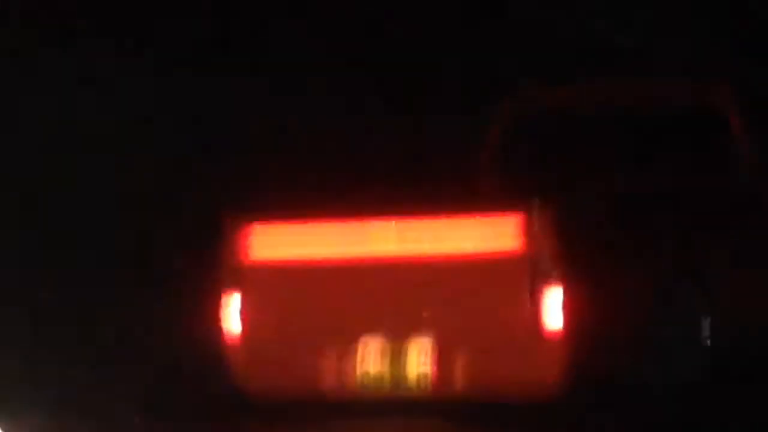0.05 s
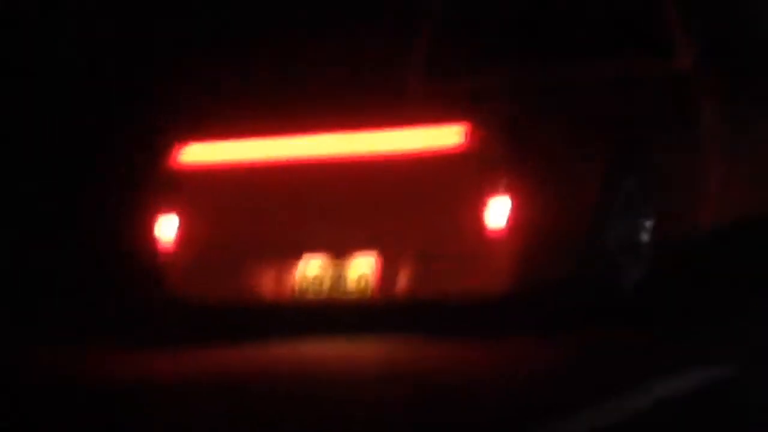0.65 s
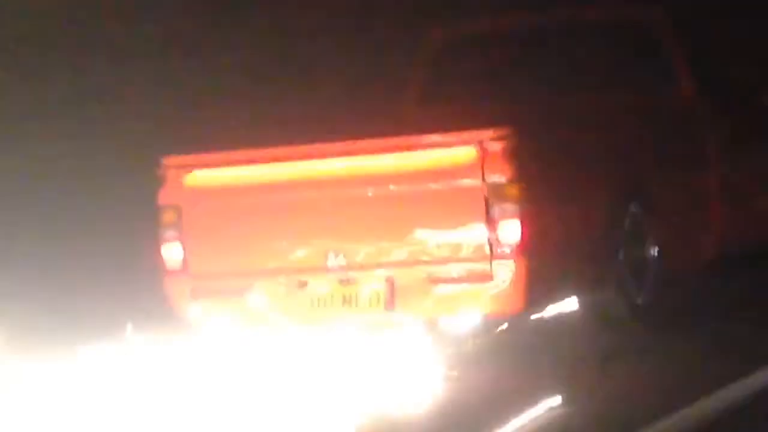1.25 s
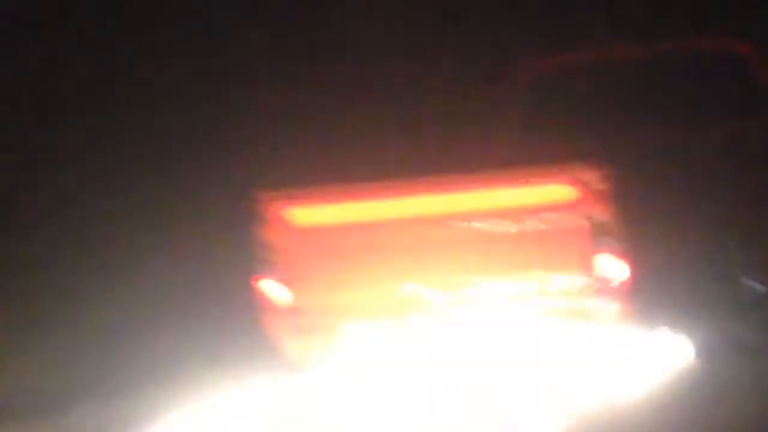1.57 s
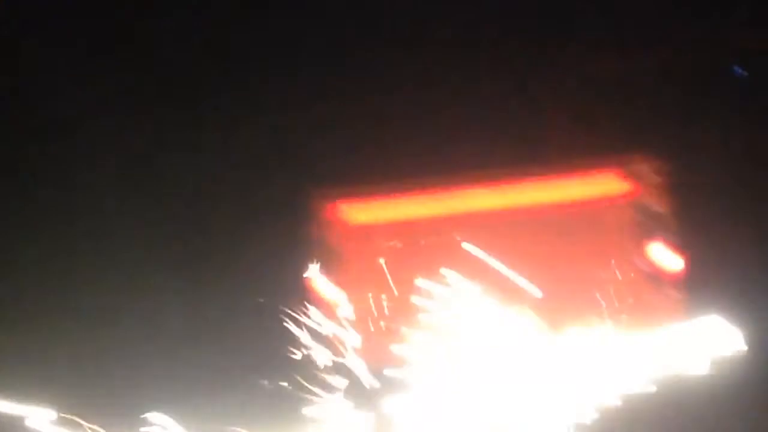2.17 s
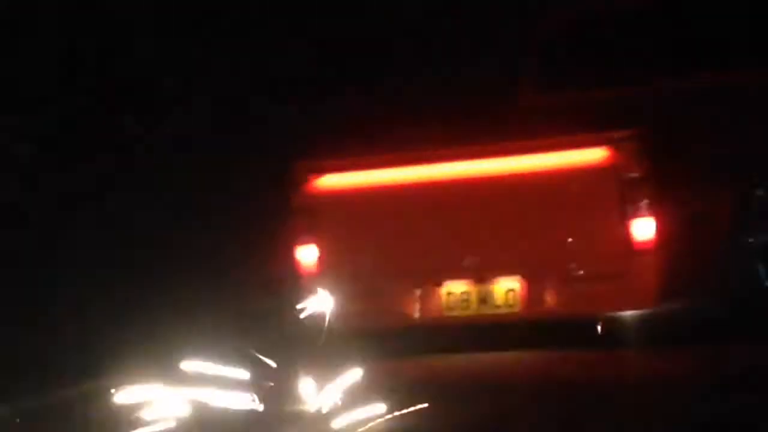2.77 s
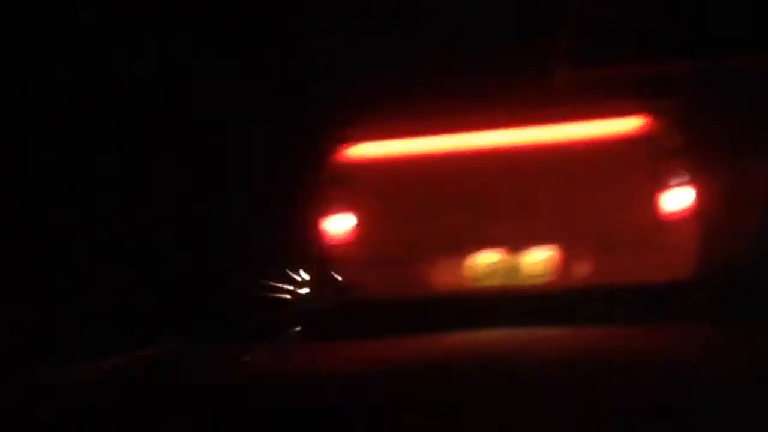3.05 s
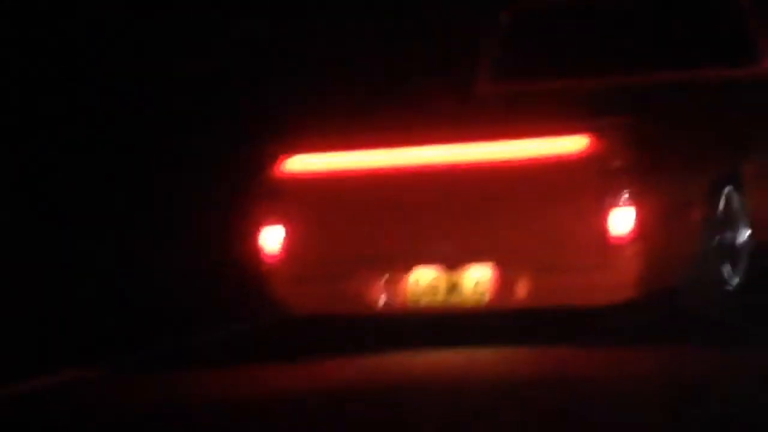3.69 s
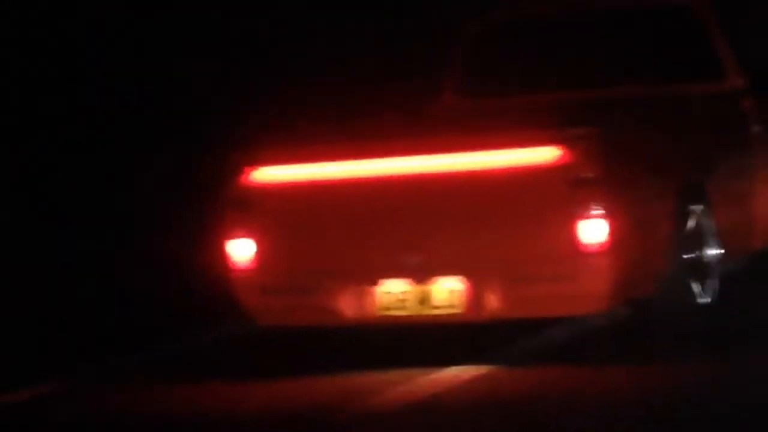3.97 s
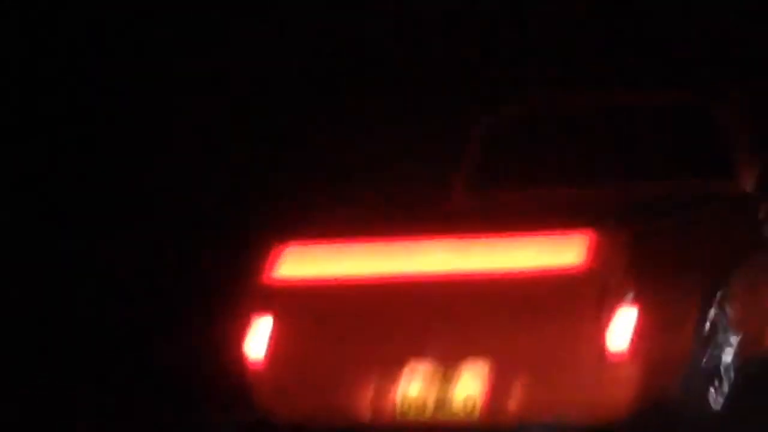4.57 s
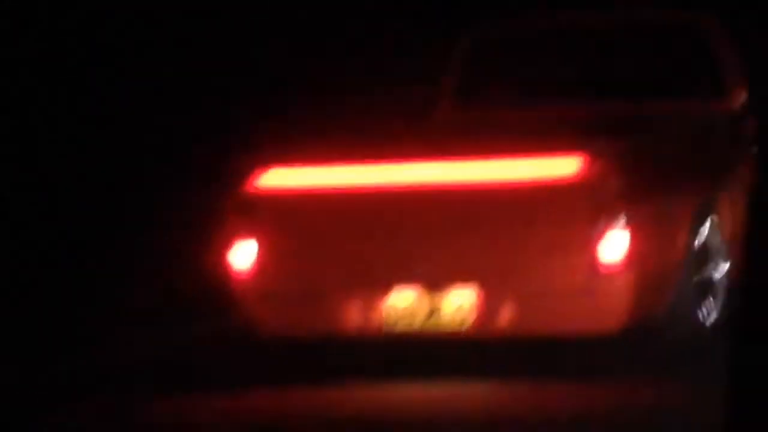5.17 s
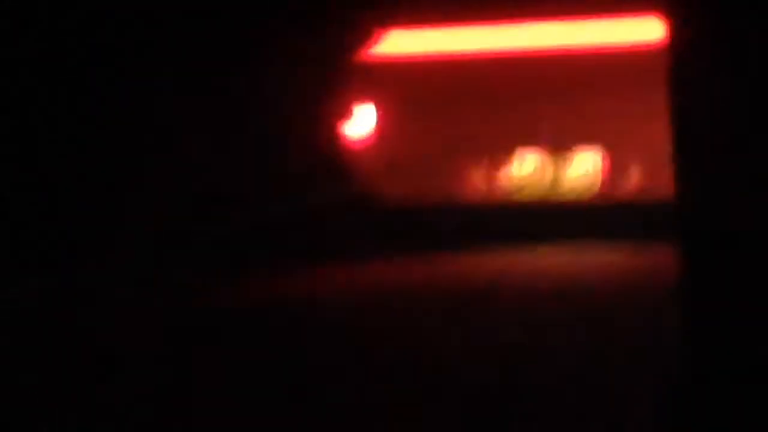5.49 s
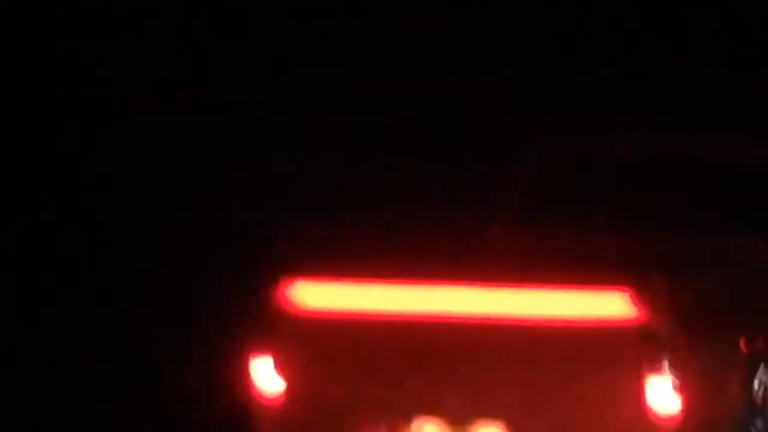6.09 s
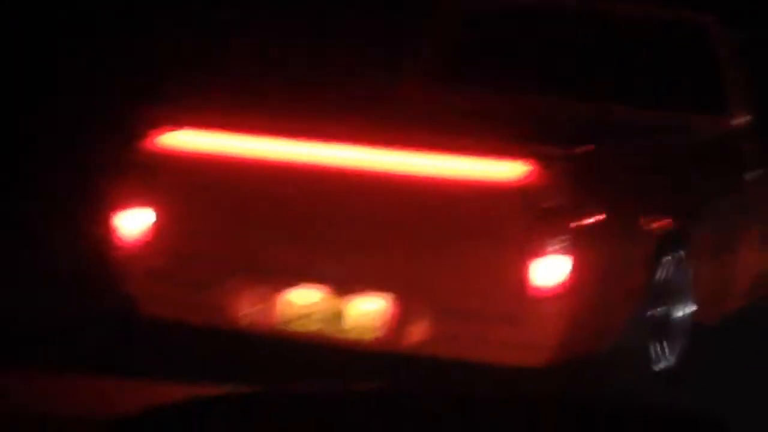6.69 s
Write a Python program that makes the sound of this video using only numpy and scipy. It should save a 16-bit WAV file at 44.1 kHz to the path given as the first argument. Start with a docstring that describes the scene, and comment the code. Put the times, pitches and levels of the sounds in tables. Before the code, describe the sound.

Wind buffets the microphone on a moving car as metal scrapes the road, then tyre roar and a low engine drone take over.

```python
"""A road at night, in a car following a lowered pickup that drags its metal underside.
The slipstream buffets and tears at the microphone, then eases to single thumps, while the skid plate
grinds on the asphalt in a few strokes. Tyre roar takes over, dipping after two hard blows of wind and
swelling back. Near the end the two engines drone against each other. A fast limiter holds the peaks."""
import sys
import numpy as np
from scipy import signal
from scipy.fft import rfft, irfft, next_fast_len
from scipy.io import wavfile
from scipy.ndimage import uniform_filter1d, minimum_filter1d, map_coordinates

SR = 44100
rng = np.random.default_rng(int(sys.argv[2]) if len(sys.argv) > 2 else 0)


def master(y):
    """Save y as 16-bit WAV."""
    cut = np.clip(np.atleast_2d(y).T, -1, 1)
    pcm = np.round(cut * 32767)  # scale
    wavfile.write(sys.argv[1], SR, pcm.astype(np.int16))


N = 301644
TIME = np.arange(N) / SR


def amp(db):
    """Decibels to gain."""
    return 10 ** (np.asarray(db) / 20)


def unit(x):
    """Scale to rms 1."""
    return x / np.sqrt(np.mean(x ** 2) + 1e-20)


def since(s):
    """Seconds since time s, 0 before it."""
    return np.maximum(TIME - s, 0)


def curves(rows):
    """An automation curve for each column after the time."""
    times, *columns = np.transpose(rows)
    return [np.interp(TIME, times, column) for column in columns]


def during(rows, fade_s):
    """A gate that is open while a table lasts, with a fade on both sides."""
    start, end = rows[0][0], rows[-1][0]
    return np.interp(TIME, [start - fade_s, start, end, end + fade_s], [0, 1, 1, 0])


def wobble(rate):
    """Smooth random modulation, rate knots a second."""
    knots = rng.standard_normal(int(N * rate / SR) + 4)
    return map_coordinates(knots, [TIME * rate])


def filtered(x, response):
    """EQ x with a gain given as a function of Hz."""
    size = next_fast_len(N + SR // 2)
    return irfft(rfft(x, size) * response(np.fft.rfftfreq(size, 1 / SR)), size)[:N]


def coloured(x, spectrum):
    """EQ x through (Hz, dB) points and scale it to rms 1."""
    points_hz, db = np.transpose(spectrum)
    return unit(filtered(x, lambda hz: amp(np.interp(np.log(hz + 1), np.log(points_hz), db))))


def noise(spectrum):
    """Coloured noise of rms 1."""
    return coloured(rng.standard_normal(N), spectrum)


def grainy(x, depth_db, top_hz, size=1024):
    """Add grain: patches of random gain over time and frequency, shallower above top_hz."""
    frames = signal.stft(x, nperseg=size)[2]
    patches = uniform_filter1d(rng.standard_normal(frames.shape), size=4, axis=0)
    patches = unit(uniform_filter1d(patches, size=4, axis=1))
    hz = np.fft.rfftfreq(size, 1 / SR)[:, None]
    gain = amp(depth_db * patches / np.hypot(1, hz / top_hz))
    return unit(signal.istft(frames * gain, nperseg=size)[1][:N])


def add(track, s, sound):
    """Mix a sound into a track from time s."""
    part = track[max(round(s * SR), 0):][:len(sound)]
    part += sound[:len(part)]


# The two engine drones. Each row: time in seconds, firing rate in Hz, relative level in dB.
TRUCK_DRONE = [(4.7, 80.4, -36), (5.2, 81.2, -29.5), (5.45, 82.1, -27), (5.62, 81.7, -21), (6.0, 82, -19.5),
               (6.25, 82.2, -20.5), (6.4, 81.3, -29.5)]
CAR_DRONE = [(5.3, 91.9, -31.5), (5.65, 90.1, -24), (5.85, 91.3, -20), (6.12, 91, -22.5), (6.36, 89.1, -26)]
# Their exhaust overtones. Each row: multiple of the firing rate, relative level in dB.
TRUCK_ORDERS = [(2, 0.5), (3, -22), (4, -26)]
CAR_ORDERS = [(2, -1.5), (3, -11), (4, -15), (5, -16)]
# The colour of the exhaust puffs. Each row: frequency in Hz, gain in dB.
EXHAUST_EQ = [(100, -17), (200, 7), (330, -9), (450, -14), (900, -45.5)]

def engine(drone, orders, level_db, jitter, rough_db, puff_db):
    """Exhaust harmonics ride a slightly unsteady firing rate, with a rough puff at each firing."""
    firing_hz, db = curves(drone)
    phase = 2 * np.pi * np.cumsum(firing_hz * (1 + jitter * wobble(25))) / SR
    tone = np.zeros(N)
    for order, order_db in orders:
        gain = amp(order_db + rough_db * wobble(40))
        tone += gain * np.sin(order * phase + rng.uniform(0, 2 * np.pi))
    puffs = unit((1 + np.cos(phase)) * noise(EXHAUST_EQ))
    return during(drone, fade_s=0.1) * amp(db + level_db) * (np.sqrt(2) * tone + amp(puff_db) * puffs)


# The bed of tyre roar. Each row: time in seconds, level before the dips in dB, coarseness from 0 to 1.
TYRE_ROAR = [(0, -25.5, 0.9), (2.0, -34.5, 0.06), (2.2, -19.5, 0.18), (2.85, -20.5, 0.13), (3.15, -19.5, 0),
             (3.45, -19, 0.05), (3.58, -18, 0.05), (3.7, -19.5, 0.21), (3.88, -18.5, 0.14),
             (4.35, -21, 0.03), (4.65, -21.5, 0.12), (4.9, -19.5, 0.01), (5.25, -20.5, 0.05),
             (5.9, -21.5, 0.68), (6.35, -20, 0.87), (6.84, -17, 1)]
# Sudden dips in the roar. Each row: start in seconds, depth in dB.
ROAR_DIPS = [(2.091, 19.5), (3.944, 11.5)]
# The colours of smooth and coarse asphalt. Each row: frequency in Hz, gain in dB.
SMOOTH_ROAD_EQ = [(60, 3.5), (200, -3), (350, -8), (500, -2), (660, 0), (870, 3), (1080, -1), (1300, -5.5),
                  (1700, -11.5), (2300, -15.5), (3000, -22.5), (5500, -24.5), (8000, -34), (11000, -42.5),
                  (15000, -49)]
COARSE_ROAD_EQ = [(100, -1), (280, -9), (550, -11), (750, -8.5), (1000, -1), (1400, -6.5), (1900, -12.5),
                  (2450, -16.5), (2850, -24), (3900, -21), (4800, -29), (6500, -34), (10000, -43),
                  (15000, -56)]

def tyres(flutter_db=0.48, fall_s=0.0043, recovery_s=0.62):
    """Tread blocks drum near 1 kHz, higher on coarse asphalt; the roar dips twice and swells back."""
    db, coarse = curves(TYRE_ROAR)
    for s, depth_db in ROAR_DIPS:
        db -= depth_db * np.minimum(since(s) / fall_s, 1) * np.exp(-since(s) / recovery_s)
    roar = np.sqrt(1 - coarse) * noise(SMOOTH_ROAD_EQ) + np.sqrt(coarse) * noise(COARSE_ROAD_EQ)
    return amp(db + flutter_db * wobble(27)) * grainy(roar, depth_db=2.6, top_hz=2600)


# Scrapes of the skid plate. Each row: start in seconds, length in seconds, relative level in dB.
PLATE_STROKES = [(0.88, 0.27, -37.5), (1.346, 0.21, -31.5), (1.746, 0.2, -30), (1.99, 0.42, -40.5),
                 (2.215, 0.16, -32.5), (2.427, 0.14, -36.5)]

def plate_pressure(bite_s=0.015, arch_db=5.5, lift_db_per_s=296):
    """The plate's load on the road, as a gain: each stroke bites, bears down mid-way and lifts off."""
    pressure = np.zeros(N)
    for s, length, db in PLATE_STROKES:
        bite = np.minimum(since(s) / bite_s, 1)
        arch = np.sin(np.pi * np.minimum(since(s) / length, 1)) - 1
        pressure += bite * amp(db + arch_db * arch - lift_db_per_s * since(s + length))
    return pressure


# The colours of grinding metal and its sparks. Each row: frequency in Hz, gain in dB.
GRIND_EQ = [(150, 7.5), (400, 2.5), (900, -2.5), (1400, -1.5), (2200, -0.5), (3200, -3.5), (4800, -5),
            (7000, -14), (10000, -25.5), (15000, -36)]
SPARK_EQ = [(2000, -28), (5000, 2), (8000, -2), (11000, -4.5), (15000, -17)]

def skid_plate(level_db=4, grit_db=2, chatter_db=1.5, fizz_db=-13, hard_press_db=-31):
    """Stones in the asphalt tear at the plate in a dense grind; hard pressure adds a fizz of sparks."""
    pressure = plate_pressure()
    grit = unit(amp(grit_db * wobble(1500) + chatter_db * wobble(98)))
    sparking = (pressure / amp(hard_press_db)) ** 1.6
    fizz = amp(hard_press_db + fizz_db) * sparking * noise(SPARK_EQ)
    grind = amp(level_db) * pressure * noise(GRIND_EQ)
    return grit * (grind + fizz)


# The bed of wind rumble. Each row: time in seconds, level before the gusts in dB.
RUMBLE = [(0, -24), (1.3, -21), (1.7, -21.5), (2.1, -22), (2.9, -20.5), (3.15, -25.5), (3.93, -22.5),
          (3.98, -32), (4.8, -29.5), (5.5, -33.5), (6.84, -29)]
# Gusts that swell the rumble. Each row: crest time in seconds, boost in dB.
GUSTS = [(.69, 12), (3.53, 5.5), (3.88, 8), (4.22, 9.5), (4.57, 7), (5.79, 10), (6.35, 15.5), (6.48, 13.5),
         (6.83, 15)]
# The colour of slow, heavy air. Each row: frequency in Hz, gain in dB.
RUMBLE_EQ = [(15, 0), (30, -10), (55, 7.5), (85, 5), (130, -3), (200, -12.5), (400, -25), (1000, -77),
             (3000, -100)]

def buffeting(gust_width_s=0.06, steadiness=0.093):
    """Large, slow eddies rock the diaphragm in an unbroken flutter that swells with each gust."""
    air = noise(RUMBLE_EQ)
    envelope = np.sqrt(np.abs(uniform_filter1d(air ** 2, size=2000)) + 1e-6)
    gust_db = sum(db * np.exp(-((TIME - s) / gust_width_s) ** 2) for s, db in GUSTS)
    return amp(curves(RUMBLE)[0] + gust_db) * unit(air / envelope ** steadiness)


# Vortices hitting the microphone. Each row: time in seconds, relative peak in dB, nominal pitch in Hz.
THUMPS = [(1.497, -6, 240), (1.525, -4, 140), (1.544, -10, 190), (1.627, -5, 180), (1.642, -1, 210),
          (1.683, -4.5, 130), (1.734, -8.5, 149), (1.764, 0.5, 140), (1.796, -8, 86.1), (1.834, -7, 107),
          (1.866, -6.5, 77.6), (1.899, -11, 258), (1.933, -5, 113), (2.03, -7, 150), (2.082, -4.5, 117),
          (2.337, -4, 65.7), (2.409, 0, 75), (2.609, -8, 69), (2.732, -13.5, 190), (2.759, -13, 105),
          (2.85, 3, 90), (2.922, -2.5, 99), (2.93, -11, 140), (3.931, -10, 150), (3.942, -6, 192),
          (3.947, -8, 230), (4.291, -7.5, 126), (5.321, -11, 175), (6.659, -11, 144)]
# The colour of their wake. Each row: frequency in Hz, gain in dB.
WAKE_EQ = [(80, -17), (200, 0), (400, -6), (700, -15), (1300, -29), (4000, -54)]

def thumps(level_db=1, width=0.91, wake_db=-18):
    """A passing vortex sucks, then pushes: one pressure swing, shorter if small, with a rough wake."""
    swings, wakes = np.zeros(N), np.zeros(N)
    t = np.arange(-SR // 20, SR // 20) / SR
    for s, db, hz in THUMPS:
        position = np.pi * hz * t / width
        swing = position / (1 + position ** 2) ** 2
        add(swings, s + t[0], amp(db + level_db) * swing / swing.max())
        add(wakes, s + t[0], amp(db + wake_db) / (1 + position ** 2))
    return swings + wakes * noise(WAKE_EQ)


def knock(at_s=2.7587, level_db=1, pitch_hz=1600, body_db=-12):
    """One hard, dry snap of pressure, over in a millisecond, on top of a duller push."""
    phase = 2 * np.pi * pitch_hz * (TIME - at_s)
    snap = phase * np.exp((1 - phase ** 2) / 2)
    body = amp(body_db) * np.exp(-(phase / 4) ** 2)
    return amp(level_db) * (snap + body)


# Rips that cut through the wind, and a few dull bursts that ring under the thumps. Each row: time in seconds,
# relative level in dB, treble reach in Hz; the rows with a reach of a few hundred Hz give the low ring of the
# thump at the same time.
RIPS = [(.021, -7, 2400), (.031, -8, 5000), (.068, -11, 5000), (.08, -11, 4000), (.129, -13, 3400),
        (.184, -9, 5200), (.206, -6, 4200), (.232, -8, 3800), (.482, -7, 6000), (.523, -7, 4500),
        (.561, -9, 4800), (.644, -9, 2400), (.708, -12, 5500), (.765, -8, 3200), (.899, -10, 3200),
        (.936, -6, 3400), (.965, -7, 4400), (1.081, -11, 2600), (1.134, -8, 3400), (1.187, -12, 5200),
        (1.214, -7, 4000), (1.237, -10, 3200), (1.258, -13, 2000), (1.305, -13, 3300), (1.354, -10, 5400),
        (1.394, -11, 2800), (1.456, -13, 3000), (1.489, -11, 2200), (1.537, -15, 2400), (1.571, -11, 3800),
        (1.623, -15, 2500), (1.735, -22, 1500), (1.765, -8, 1500), (1.777, -9, 2000), (1.9, -7, 2400),
        (2.031, -8, 1800), (2.086, -6, 2300), (2.34, -12, 2000), (3.937, -4, 260), (4.293, -18, 500),
        (6.659, -14, 500)]

def rips(level_db=3.5, life_s=0.0007, lead_s=0.002, evenness=0.6, body_hz=300):
    """Sharp, toneless cracks cut through the wind, each as bright as its treble reach allows; a low reach gives
    a short, dull burst that rings under a thump."""
    track, t = np.zeros(N), np.arange(SR // 40) / SR
    hz = np.fft.rfftfreq(len(t), 1 / SR)
    age = np.maximum(t - lead_s, 0) / life_s
    body = hz / np.hypot(hz, body_hz) ** (4 / 3)
    for s, db, reach_hz in RIPS:
        burst = rfft(age * np.exp(-age) * rng.standard_normal(len(t)))
        flattened = burst / (np.abs(burst) + 1e-6) ** evenness
        colour = body / np.hypot(1, (hz / reach_hz) ** 2.8)
        crack = irfft(flattened * colour, len(t))
        crack /= np.sqrt(np.sum(crack ** 2) / (0.002 * SR))  # the energy of 2 ms at rms 1
        add(track, s - lead_s, amp(db + level_db) * crack)
    return track


def lulls(length_s=0.011, overlap_s=0.001, depth_db=7):
    """The flow clings smoothly for a moment before each rip, as a dip in gain."""
    lull, t = np.zeros(N), np.arange(round(length_s * SR)) / SR
    for s, _, _ in RIPS:
        add(lull, s + overlap_s - length_s, np.sin(np.pi * t / length_s))
    return amp(-depth_db * np.minimum(lull, 1))


# The colour of tearing air. Each row: frequency in Hz, gain in dB.
TEAR_EQ = [(100, -32), (400, 9.5), (900, 3), (1600, -3.5), (2800, -8.5), (4500, -15), (7000, -24),
           (10000, -31.5), (15000, -40)]

def tearing(eddies, roar, excess_db, life_s=0.0016, end_s=1.61, fade_s=0.013):
    """Eddies tear in tiny bursts, hardest on the pressure crests, sparser as excess_db falls below 0."""
    crests = np.abs(uniform_filter1d(np.abs(roar), size=130)) ** 0.31
    tears = eddies * (rng.random(N) < amp(0.7 * excess_db))
    decay = np.exp(-2 * TIME[:SR // 100] / life_s)
    bursts = np.sqrt(np.abs(signal.fftconvolve(tears ** 2, decay)[:N]))
    gate = np.clip((end_s - TIME) / fade_s, 0, 1)
    crackle = coloured(gate * crests * bursts * rng.standard_normal(N), TEAR_EQ)
    return np.sqrt(gate.mean()) * crackle  # rms near 1 while the gate is open


# The opening blast of wind. Each row: time in seconds, flow strength in dB.
BLAST = [(0, -7), (.06, -12.5), (.18, -14), (.215, -7.5), (.45, -8.5), (.62, -11.5), (.95, -10),
         (1.04, -13), (1.4, -15.5), (1.6, -21), (1.73, -28), (2.0, -38)]
# The colour of fast air. Each row: frequency in Hz, gain in dB.
BLAST_EQ = [(30, -36), (80, -13), (130, -1), (300, 0), (460, -4.5), (700, -10.5), (1200, -21), (2800, -39),
            (6000, -62), (15000, -90)]

def slipstream(roar_db=1, eddies_per_s=560, eddy_share=0.93, flap_db=-4, flap_hz=132,
               tear_db=5, full_tear_db=-11.5, tear_growth=1.834):
    """Fast air flaps at the port and small eddies pelt the diaphragm; a weak flow is dull and fitful."""
    strength_db, = curves(BLAST)
    slack_db = np.clip(full_tear_db - strength_db, 0, 6)
    gusting_db = 2.8 + 0.3 * slack_db
    flow_db = strength_db + gusting_db * np.minimum(wobble(45), 1)
    arrivals = rng.random(N) < eddies_per_s / SR
    eddies = arrivals * amp(1.5 * np.minimum(rng.standard_normal(N), 1.6))
    pushes = coloured(eddies * rng.choice([-1, 1], N), BLAST_EQ)
    flap = filtered(rng.standard_normal(N), lambda hz: np.exp(-2 * np.log2((hz + 1) / flap_hz) ** 2))
    rush = np.sqrt(eddy_share) * pushes + np.sqrt(1 - eddy_share) * noise(BLAST_EQ)
    calm = lulls()
    roar = calm * rush + amp(flap_db + 0.97 * slack_db) * unit(flap)
    tear = calm * tearing(eddies, roar, strength_db - full_tear_db)
    # the tearing grows faster with the flow than the roar does
    blast = amp(flow_db + roar_db) * roar + amp(tear_growth * flow_db + tear_db) * tear
    return during(BLAST, fade_s=0.092) * blast


def scene():
    """A mono mix: wind up front on the microphone, the road sounds behind it."""
    wind = buffeting() + slipstream() + thumps() + rips() + knock()
    truck = engine(TRUCK_DRONE, TRUCK_ORDERS, level_db=-3, jitter=0.007, rough_db=2.5, puff_db=-7)
    car = engine(CAR_DRONE, CAR_ORDERS, level_db=-2.5, jitter=0.0048, rough_db=3.5, puff_db=-9)
    return (wind + skid_plate() + tyres() + truck + car)[None]


def record(dry, low_cut_hz=38, ceiling=0.68, top_hz=15400):
    """The microphone sheds the deepest bass, a fast limiter ducks the peaks, and the top ends steeply."""
    x = filtered(dry[0], lambda hz: hz ** 4 / (hz ** 4 + low_cut_hz ** 4))
    needed_gain = np.minimum(1, ceiling / (np.abs(x) + 1e-9))
    gain = uniform_filter1d(minimum_filter1d(needed_gain, size=36), size=36)
    return filtered(x * gain, lambda hz: hz < top_hz)[None]


dry = scene()
out = record(dry)
master(out)
```